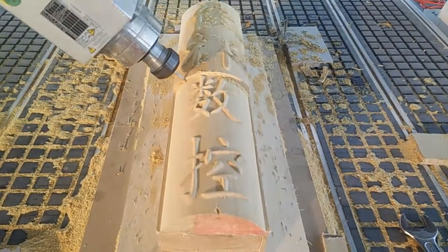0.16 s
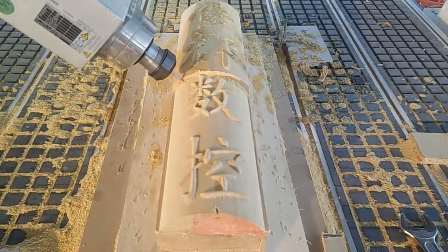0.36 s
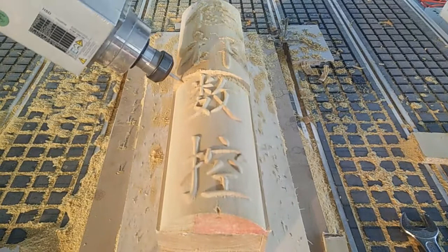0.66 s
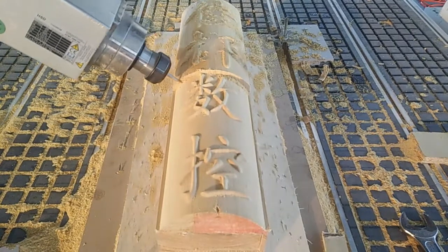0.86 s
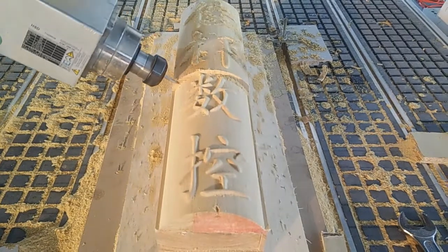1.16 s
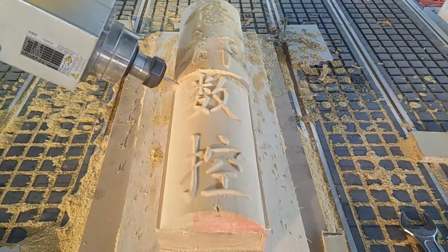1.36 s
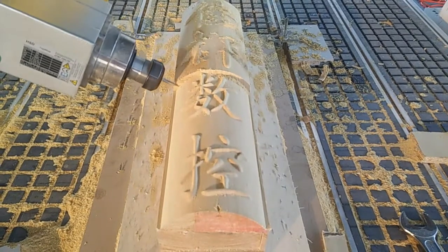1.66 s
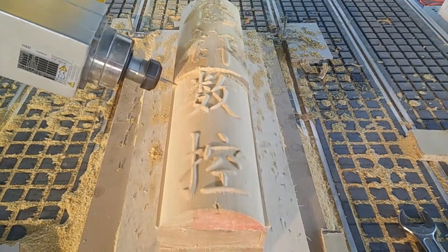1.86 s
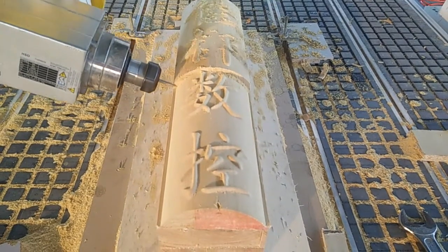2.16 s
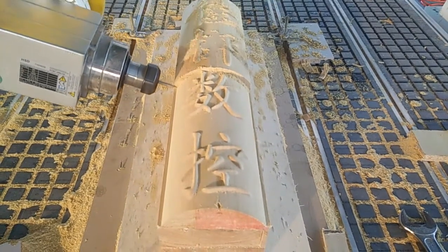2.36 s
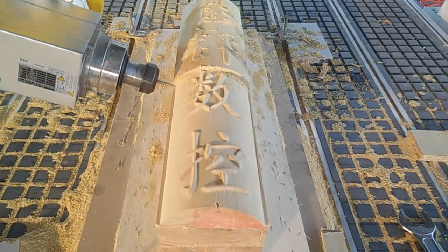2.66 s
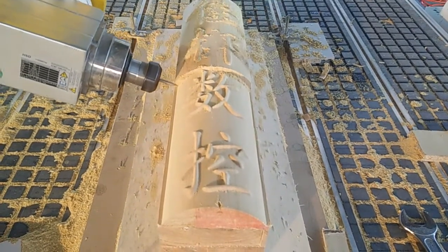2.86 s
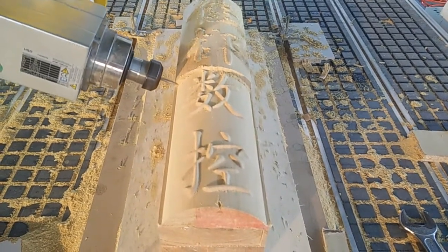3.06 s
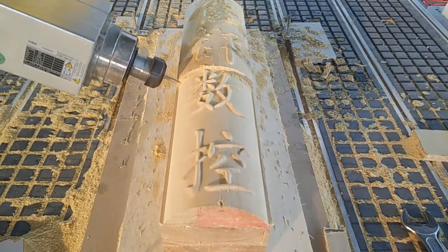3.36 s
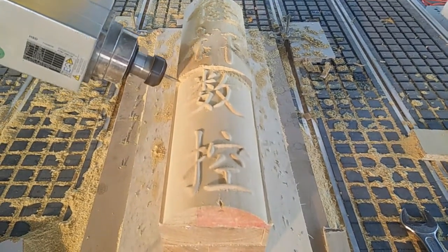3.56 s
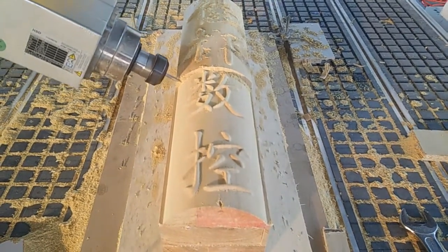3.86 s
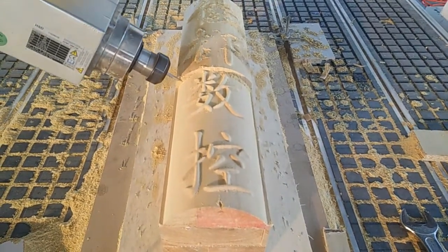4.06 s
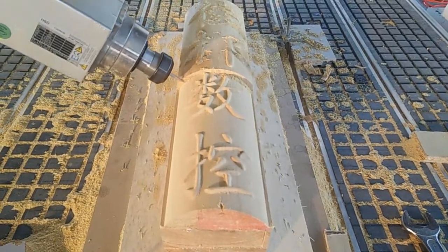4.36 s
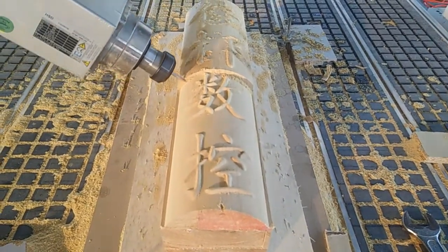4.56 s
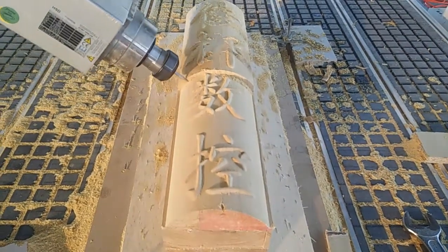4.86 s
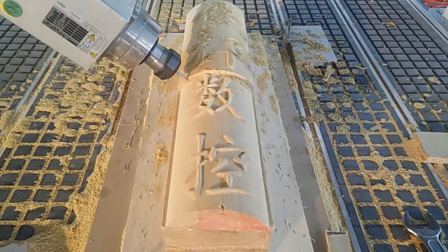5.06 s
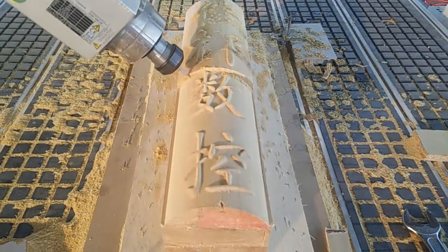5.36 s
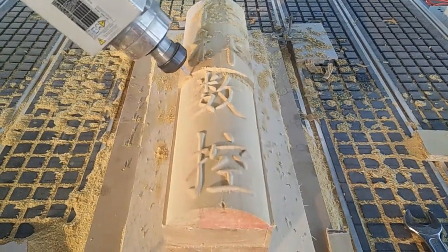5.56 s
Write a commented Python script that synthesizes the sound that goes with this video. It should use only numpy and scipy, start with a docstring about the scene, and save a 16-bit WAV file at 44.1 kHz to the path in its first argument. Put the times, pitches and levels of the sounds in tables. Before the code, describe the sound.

A milling spindle spins without pause for about 5.7 seconds, heard close up in stereo in a workshop. Cooling air rushes hollowly through its housing with thin, wavering whine tones, and within the first half second a bright, slightly raspy hiss with two ringing ridges swells up. Its pitch colour glides differently on each side as the head swings level; scattered hollow knocks and faint ticks poke through. Around 1.8 to 3 seconds the cut bites deeper, and a low drone and rough wooden hum rise; from about 2.2 seconds the right side sinks markedly, leaving the left louder. From 3 to 4.2 seconds short hollow knocks crowd in, with quick scratchy catches and a gap near 3.55. After 4.2 the left side sinks, and at about 4.46 the bass falls away abruptly. A quieter, thinner, steadier hissing rush continues, with short rumbles near 5.1 and 5.5 seconds.

```python
"""A CNC router spindle turns at about 15700 rpm (whining sine partials) as its bit skims a wooden column.
From the start cooling air rushes through the housing (noise through resonances) and a bright two-ridged
hiss swells, shifting as the head swings level. Near 2 s the cut makes wood and bed drone (tones and rough
noise), and the right side sinks. From 3 s hollow knocks (ringing sines) crowd in. Past 4 s the left side
sinks, and at last the bass falls away suddenly, with two short returns of rumble."""
import sys
import numpy as np
from scipy import signal
from scipy.fft import rfft, irfft
from scipy.io import wavfile
from scipy.ndimage import uniform_filter1d, minimum_filter1d, map_coordinates

SR = 44100
rng = np.random.default_rng(int(sys.argv[2]) if len(sys.argv) > 2 else 0)


def store_pcm(level_fs):
    """Save levels as 16-bit WAV."""
    pcm = np.round(np.clip(level_fs, -1, 1) * 32767).astype(np.int16)
    wavfile.write(sys.argv[1], SR, np.atleast_2d(pcm).T)


N = 251370
TIME = np.arange(N) / SR
WINDOW, HOP = 1024, 256  # samples: length and spacing of the frames that slow filters work on
BIN_HZ = np.arange(WINDOW // 2 + 1)[:, None] * SR / WINDOW


def undb(db):
    """Decibels to gain."""
    return 10 ** (np.asarray(db) / 20)


def unit(x):
    """Scale each channel to rms 1."""
    return x / np.sqrt(np.mean(x ** 2, axis=-1, keepdims=True))


def curves(table):
    """The columns of a timed table, one value per sample."""
    s, *columns = np.transpose(table)
    return [np.interp(TIME, s, c) for c in columns]


def on_bins(points):
    """A table of (pitch_hz, value) joined on a log-frequency axis."""
    hz, value = np.transpose(points)
    return np.interp(np.log(np.arange(N // 2 + 1) * SR / N + 1), np.log(hz), value)


def walk(rate):
    """Random levels held 1 / rate s and smoothed twice; spread near 1."""
    hold = max(2, int(SR / rate))
    steps = np.repeat(rng.standard_normal(N // hold + 1), hold)
    return 1.3 * uniform_filter1d(uniform_filter1d(steps, hold), hold)[:N]


def swells(table):
    """Bell-shaped lifts in dB from rows of (centre_s, half_length_s, lift_db)."""
    return sum(db * np.exp(-((TIME - s) / length_s) ** 2) for s, length_s, db in table)


def ramp(start_s, length_s):
    """Rises from 0 to 1 and stays."""
    return np.clip((TIME - start_s) / length_s, 0, 1)


# the head swings up to level and back: time_s, tilt (0 steep - 1 level)
HEAD_SWING = [(0, 0.22), (.5, 0.054), (1.1, 0.31), (1.9, 0.88), (2.7, 0.97), (3.3, 0.63), (4.1, 0.42),
              (5.7, 0.49)]


def by_tilt(steep, level):
    """A value that follows the head between its steep and level positions."""
    return steep + np.clip(curves(HEAD_SWING)[0], 0, 1) * (level - steep)


# likeness of the two sides: pitch_hz, share of common sound (0-1)
SIDE_LIKENESS = [(100, 0.9), (300, 0.77), (700, 0.75), (2300, 0.77), (4500, 0.65), (5400, 0.04), (9000, 0)]


def turbulence(spectrum=None):
    """Two-sided noise at rms 1, partly common to both sides, coloured by a spectrum."""
    common, *own = rfft(rng.standard_normal((3, N)))
    share = np.clip(on_bins(SIDE_LIKENESS), 0, 1)
    bins = np.sqrt(share) * common + np.sqrt(1 - share) * np.array(own)
    colour = 1 if spectrum is None else undb(on_bins(spectrum))
    return unit(irfft(bins * colour, N))


def resonance(hz, width_hz):
    """Power response of a steep-skirted resonance, 1 at its centre."""
    return 1 / (1 + ((BIN_HZ - hz) / width_hz) ** 2) ** 3


def shape(x, gain):
    """Pass a sound through a slowly moving frequency response."""
    frames = signal.stft(x, nperseg=WINDOW, noverlap=WINDOW - HOP)[2]
    last = gain.shape[-1] - 1
    frames = frames * gain[..., np.minimum(np.arange(frames.shape[-1]), last)]
    return signal.istft(frames, nperseg=WINDOW, noverlap=WINDOW - HOP)[1][:, :N]


def ripple(depth_db, spacing_hz, full_hz):
    """Fine fixed peaks and dips that the workshop's echoes give a steady noise, deepest in the treble."""
    hz = np.arange(N // 2 + 1) * SR / N
    bumps = np.interp(hz / spacing_hz, np.arange(WINDOW), rng.standard_normal(WINDOW))
    return undb(depth_db * np.minimum(hz / full_hz, 1) * bumps)


def blow(power):
    """Turbulent air, coloured by the room and shaped by a slowly moving power response."""
    colour = ripple(depth_db=1.25, spacing_hz=24.01, full_hz=2600)
    air = unit(irfft(rfft(turbulence()) * colour, N))
    return shape(air, np.sqrt(power))


# colour of the open air: pitch_hz, relative level_db (per Hz)
AIR_SPECTRUM = [(60, -58), (200, -24.5), (350, -17), (480, -15), (700, -20.5), (1700, -3), (2900, 2.5),
                (3500, 0), (4600, 2), (5700, -1), (6400, -9), (7300, -22.5), (8300, -47.5), (15000, -72.5)]


def open_air(db):
    """The even, wide rush of air round the spindle; it dips when the bit slips."""
    flicker_db = .8 * walk(12)
    slip_db = np.minimum(swells(BIT_CATCHES), 0)
    return turbulence(AIR_SPECTRUM) * undb(db + flicker_db + slip_db)


# colour of the top noise: pitch_hz, relative level_db (per Hz)
TOP_NOISE_SPECTRUM = [(6000, -20), (7400, 4), (8500, 4), (9400, 2), (10300, -8), (11700, -6), (13500, -12),
                      (15500, -30)]
# strength of the top noise: time_s, level_db
TOP_NOISE_STRENGTH = [(0, -67), (.3, -63), (.7, -59), (1.4, -64), (1.9, -64.5), (2.65, -74.5), (3.1, -64),
                      (3.65, -60), (4.1, -61.5), (4.4, -68), (5.7, -67)]


def top_noise(flicker_db, flicker_rate):
    """Faint treble noise above the hiss, flickering unevenly."""
    level_db = curves(TOP_NOISE_STRENGTH)[0] + flicker_db * walk(flicker_rate)
    return turbulence(TOP_NOISE_SPECTRUM) * undb(level_db)


# faint ticks: start_s, level_db of the noise burst at its start
TICK_TIMES = [(.533, -31), (0.714, -24), (1.158, -34), (1.58, -34), (1.641, -27), (1.693, -33),
              (2.858, -31)]


def ticks(decay_s, edge_hz):
    """Short bright ticks over the hiss: bursts of noise that die away fast."""
    out, age = np.zeros(N), TIME[:WINDOW]
    bursts = rng.standard_normal((len(TICK_TIMES), WINDOW))
    for (s, db), burst in zip(TICK_TIMES, bursts):
        start = int(s * SR)
        out[start:start + WINDOW] += undb(db) * burst * np.exp(-age / decay_s)
    return signal.sosfilt(signal.butter(1, edge_hz, fs=SR, output="sos"), out)


# tone at half the shaft rate: its peak relative to the rumble, and how it fades
HALF_TONE_DB, HALF_TONE_DROP_DB = -0.5, -21.5
HALF_TONE_STOP_S, HALF_TONE_FADE_S = 2.6, .3
# colours of the bed and wood noise: pitch_hz, relative level_db (per Hz)
BED_SPECTRUM = [(25, -12.5), (55, -16.5), (82, 8), (110, 4), (135, 3), (165, -1.5), (260, -12.5),
                (500, -62)]
WOOD_SPECTRUM = [(120, -18), (200, -5.5), (260, -0.5), (295, -4), (340, 3), (400, -5), (480, -40.5),
                 (900, -55.5)]
# hum of the bit striking once a turn: time_s, level_db before a small cut and waver
STRIKE_HUM = [(0, -46), (.3, -51.5), (1.0, -50), (1.35, -45), (1.6, -43.5), (1.85, -32), (2.15, -35),
              (2.35, -31.5), (2.52, -30), (2.8, -32), (3.05, -40.5), (3.6, -44), (4.4, -47), (4.6, -54.5),
              (5.7, -51)]


def drone(turns, rumble_db, wood_db):
    """The cut shakes the bed and the column: a tone once a turn, one at half that rate, and rough noise."""
    half_db = HALF_TONE_DB + HALF_TONE_DROP_DB * ramp(HALF_TONE_STOP_S, HALF_TONE_FADE_S)
    half_tone = undb(half_db) * np.sin(np.pi * turns)
    bed = undb(-1.5 + 0.72 * walk(25)) * turbulence(BED_SPECTRUM) + half_tone
    hum_db = curves(STRIKE_HUM)[0] - 1 + 2.3 * walk(26)
    hum = np.sqrt(2) * undb(hum_db) * np.sin(2 * np.pi * turns)
    return bed * undb(rumble_db) + turbulence(WOOD_SPECTRUM) * undb(wood_db) + hum


CHATTER_MODES, CHATTER_COUNT = 6, 260  # how many of the first resonances ring, and how many knocks


def chatter(rush_db, lift_db, scatter_db, detune):
    """Lesser knocks at random moments on low resonances, following the rush: (start_s, pitch_hz, peak_db)."""
    rows = []
    for when, which, tune, size in rng.random((CHATTER_COUNT, 4)):
        at = int(when * N)
        hz, _, steep_db, level_db, _ = HOUSING_MODES[int(which * CHATTER_MODES)]
        knock_hz = hz * (1 + detune * (2 * tune - 1))
        mode_db = (steep_db + level_db) / 2
        rows.append((TIME[at], knock_hz, rush_db[at] + lift_db + mode_db + scatter_db * (2 * size - 1)))
    return rows


def knocks(table, ring_s, attack_s):
    """Short hollow knocks, each a sine that swells quickly and rings out."""
    age = TIME[:4 * WINDOW]
    out = np.zeros(N + len(age))
    envelope = (1 - np.exp(-age / attack_s)) * np.exp(-age / ring_s)
    envelope /= envelope.max()
    for (s, hz, db), phase in zip(table, rng.random(len(table))):
        start = int(s * SR)
        out[start:start + len(age)] += undb(db) * envelope * np.sin(2 * np.pi * (hz * age + phase))
    return out[:N]


# spindle whine: {multiple of the shaft rate: level_db before it wavers}
SHAFT_PARTIALS = {3: -46.5, 4: -52, 6: -36.5, 13: -37, 14: -43.5, 15: -41.5, 16: -39, 17: -41.5, 18: -49}


def whine(turns, waver_db):
    """Steady partials of the shaft, each wavering in strength and reaching each side in its own phase."""
    out = 0
    for multiple, db in SHAFT_PARTIALS.items():
        phase = rng.random((2, 1))
        level = np.sqrt(2) * undb(db + waver_db * walk(9.8))
        out = out + level * np.sin(2 * np.pi * (multiple * turns + phase))
    return out


FLUTTER_DB, STEADIER_FLUTTER_DB = 3, 1  # of narrow resonances, before and after the bass falls away
FLUTTER_WIDTH_HZ = 126  # resonances wider than this flutter less
# resonances of the housing: pitch_hz, width_hz, steep_db and level_db (head steep or level),
# right_db (right side over left)
HOUSING_MODES = [(649.6, 44, 1, 0, -0.5), (827.4, 114, -1, -0.5, -0.5), (1112, 103, -6, -0.5, 4),
                 (1294, 67, -13, 2.5, 4.5), (1513.4, 71, 3, 5.5, 1.5), (1866, 54, 7.5, -1.5, -5),
                 (2282, 107, 0.5, -1.5, 8), (2662, 90, -0.5, 3.5, -2.5), (2840, 167, -15, 9.5, -2),
                 (3180, 100, 6, -0.5, -2), (3520, 235, 8, 2.5, 0)]


def housing(dropped, flutter_rate, wander_share):
    """Cooling air rings the housing; the tilt sets each resonance's strength, and each wanders a little."""
    flutter_db = FLUTTER_DB + dropped * (STEADIER_FLUTTER_DB - FLUTTER_DB)
    power = 0
    for hz, width_hz, steep_db, level_db, right_db in HOUSING_MODES:
        flutter = flutter_db * min(1, FLUTTER_WIDTH_HZ / width_hz) * walk(flutter_rate)
        db = (by_tilt(steep_db, level_db) + flutter)[::HOP]
        centre_hz = hz * (1 + wander_share * walk(14)[::HOP])
        sides = undb([db, db + right_db])[:, None] ** 2
        power = power + sides * resonance(centre_hz, width_hz)
    return unit(blow(power))


# the bit catches or slips in the grain: centre_s, half_length_s, hiss lift_db
BIT_CATCHES = [(1.829, 0.0086, 2.5), (1.977, 0.0068, 8), (2.31, 0.013, 4.5), (2.858, 0.0054, 5),
               (2.892, 0.011, 6.5), (3.248, 0.0036, 0), (3.466, 0.009, 3), (3.487, 0.0049, 8),
               (3.509, .003, 4), (3.519, 0.011, -6), (3.538, .003, 2), (3.57, .004, -11),
               (3.577, .0025, 12), (3.587, 0.0078, 5), (3.645, 0.027, 3), (3.859, .003, 11),
               (3.897, .003, 0), (3.989, 0.0045, 2), (4.017, 0.0047, 7)]
# strength of the hiss: time_s, left_db, right_db
HISS_STRENGTH = [(0, -20, -20), (.08, -12, -13), (.45, -8, -9.5), (.85, -9, -5), (1.35, -8, -5.5),
                 (1.75, -13, -14.5), (2.3, -8, -11.5), (2.5, -18, -10), (2.66, -12, -8), (2.88, -13.5, -11),
                 (3.02, -14, -10), (3.25, -12.5, -12.5), (3.65, -10, -12.5), (4.0, -11, -11),
                 (4.4, -16, -11.5), (5.7, -13.5, -13)]
# weaker bands round the ridges: pitch_hz, width_hz, steep_db and level_db (head steep or level)
HISS_SHOULDERS = [(4220, 946, -16, -17), (5485, 365, -20.5, -16)]
# two ringing ridges as each side hears them: time_s, lower_hz, upper_hz, upper_db (upper over lower)
LEFT_RIDGES = [(.45, 3850, 4400, 0), (.95, 4210, 4420, -0.5), (1.55, 4130, 4690, -3.5),
               (2.1, 4120, 4650, -10), (2.4, 4225, 4840, -9.5), (2.75, 4330, 4710, -0.5),
               (3.2, 4110, 4660, -13.5), (3.7, 4006, 4810, -14), (4.05, 3980, 4460, -6.5),
               (4.5, 3780, 4360, 0.5)]
RIGHT_RIDGES = [(.5, 4350, 4620, -10), (1.05, 4504, 4660, -3), (1.5, 4340, 4820, 4.5),
                (2.1, 4320, 4950, -0.5), (2.749, 4360, 4810, 5.5), (3.7, 4300, 4680, -4.5),
                (4.5, 4286, 4780, -6.5)]
# widths of the ridges: lower_hz, upper_hz
RIDGE_WIDTHS = (325, 257)


def hiss(dropped, rasp_db, rasp_rate, waver_hz, sway_db):
    """Two ringing ridges from the whirling tool glide and trade strength; uneven bites make them rasp."""
    shoulders = 0
    for hz, width_hz, steep_db, level_db in HISS_SHOULDERS:
        shoulders = shoulders + undb(by_tilt(steep_db, level_db)[::HOP]) ** 2 * resonance(hz, width_hz)
    power = []
    for table in (LEFT_RIDGES, RIGHT_RIDGES):
        lower_hz, upper_hz, upper_db = curves(table)
        lower, upper = (resonance((hz + waver_hz * walk(25))[::HOP], width_hz)
                        for hz, width_hz in zip((lower_hz, upper_hz), RIDGE_WIDTHS))
        weight = undb(upper_db[::HOP]) ** 2
        power.append((lower + weight * upper) / (1 + weight) + shoulders)
    sides_db = [db + swells(BIT_CATCHES) + sway_db * walk(8.3) for db in curves(HISS_STRENGTH)]
    rasp = undb(rasp_db * (1 - dropped / 2) * walk(rasp_rate))
    return unit(blow(np.array(power)) * rasp) * undb(sides_db)


# hollows that move as the head swings, each a list of: time_s, centre_hz, depth_db (negative is a dip)
MOVING_HOLLOWS = [
    [(0, 3020, -6), (.3, 2886, -18), (.8, 2850, -10), (1.3, 2803, 3.5)],
    [(.6, 2050, -3.5), (1.05, 2025, -6), (1.7, 2070, -3), (2.1, 2360, -6.5), (2.4, 2435, -7.5),
     (2.75, 2500, -6), (3.1, 2330, -2.5), (4.2, 2470, -1.5), (4.6, 2495, -5.5)],
]


def hollow(width_hz):
    """Moving notches in dB, as from the direct sound meeting its echo off the wood."""
    return sum(db[::HOP] * resonance(hz[::HOP], width_hz) for hz, db in map(curves, MOVING_HOLLOWS))


STREAK_DB, STREAK_S, STREAK_BINS = 3.2, .09, 3  # spread, smoothing in time and in frequency bins


def streaks(patchy):
    """Short-lived narrow treble peaks and dips in dB, random on each side, until the bass falls away."""
    spread = (1, STREAK_BINS, int(STREAK_S * SR / HOP))
    field = rng.standard_normal((2, len(BIN_HZ), len(TIME[::HOP])))
    for axis in (1, 2, 2):
        field = uniform_filter1d(field, spread[axis], axis=axis)
    treble = np.clip(BIN_HZ / 1200 - 1, 0, 1)
    return STREAK_DB * treble * patchy[::HOP] * field / field.std()


UPPER_WIDTH_HZ = 550
# a band above the ridges as each side hears it: time_s, centre_hz, lift_db (negative is a dip)
LEFT_UPPER_BAND = [(.3, 4800, -3), (.9, 5360, -4), (1.7, 6100, -5), (2.7, 6200, -9), (3.4, 5850, -9.5),
                   (3.9, 5400, -0.5), (4.6, 5400, 2)]
RIGHT_UPPER_BAND = [(0.299, 5400, -5), (1.0, 5830, -2.5), (1.5, 5930, 3.5), (2.0, 5960, 8), (2.6, 6100, 4),
                    (3.4, 6300, 10.5), (4.6, 6300, 2.5)]


def colour_treble(x, patchy):
    """Moving hollows, a band that differs on each side, and random streaks colour the sound."""
    upper_db = [db[::HOP] * resonance(hz[::HOP], UPPER_WIDTH_HZ)
                for hz, db in map(curves, (LEFT_UPPER_BAND, RIGHT_UPPER_BAND))]
    return shape(x, undb(hollow(width_hz=374) + upper_db + streaks(patchy)))


SHAFT_HZ = 261.7  # mean turns per second
# the bass falls away suddenly and the sound grows steadier
BASS_DROP_S, BASS_DROP_LENGTH_S = 4.46, .02
DROP_RUSH_DB, DROP_RUMBLE_DB, DROP_WOOD_DB = -0.5, -27.5, -6.5
# levels with the head steep and level
RUSH_STEEP_DB, RUSH_LEVEL_DB = -20, -22
RUMBLE_STEEP_DB, RUMBLE_LEVEL_DB = -49.5, -42
WOOD_STEEP_DB, WOOD_LEVEL_DB = -54.5, -41.5
RUSH_LEFT_DB = 1.5  # the rush leans to the left until the bass falls away
KNOCK_RIGHT_DB = -6  # the knocks lean to the left
RIGHT_LAG_S = 0.00013
# surges of the rush, jolts of the bed, deeper cuts of the bit: centre_s, half_length_s, lift_db
RUSH_SURGES = [(.2, 0.34, 4.5), (.65, 0.047, 3.5), (1.05, 0.25, 4.5), (2.93, 0.073, -2), (3.26, 0.1, 2),
               (3.55, 0.35, 2), (3.84, 0.074, 3), (4.15, 0.17, 3.5)]
BED_JOLTS = [(.04, 0.26, 7), (.76, .08, -6), (1.2, 0.26, 7.5), (1.8, 0.17, 3.5), (2.48, 0.11, 9),
             (2.94, 0.12, 10), (3.24, .07, 9.5), (3.52, 0.082, 6), (3.76, .04, 7.5), (4.38, 0.088, 5),
             (5.07, .04, 24), (5.54, 0.11, 20)]
DEEP_CUTS = [(.1, 0.11, 8.5), (1.88, 0.14, 10.5), (2.5, 0.13, 9), (2.75, 0.13, 10.5)]
# knocks of the cut, each ringing mainly one resonance: start_s, pitch_hz, peak_db (on the left)
CUT_KNOCKS = [(.12, 392, -29), (.138, 1790, -19), (.465, 813, -19), (.59, 1527, -16.5), (.873, 1517, -14),
              (.995, 643, -14), (1.132, 827, -16), (1.303, 1474, -15), (1.623, 1500, -17),
              (1.66, 655, -23.5), (1.774, 676, -19.5), (2.543, 642, -17), (2.81, 2774, -12.5),
              (3.06, 2950, -12), (3.149, 1504, -12.5), (3.18, 1560, -13.5), (3.194, 266, -24.5),
              (3.232, 1490, -11), (3.262, 1820, -20), (3.27, 2740, -10), (3.283, 648, -15),
              (3.325, 1890, -22), (3.452, 657, -17), (3.462, 2784, -10), (3.533, 1477, -14),
              (3.635, 667, -18), (3.765, 1504, -12.5), (3.824, 1120, -17.5), (3.862, 825, -18),
              (4.032, 647, -16.5), (4.07, 655, -18), (4.085, 660, -19), (4.1, 2590, -15),
              (4.106, 787, -14.5), (4.144, 1475, -12.5), (4.163, 634, -17.5), (4.18, 2620, -12.5),
              (4.205, 2630, -14)]


def scene():
    """Mix the sources, many following the head's tilt; sound reaches the left side a little sooner."""
    dropped = ramp(BASS_DROP_S, BASS_DROP_LENGTH_S)
    rush_db = by_tilt(RUSH_STEEP_DB, RUSH_LEVEL_DB) + swells(RUSH_SURGES)
    rush_db += DROP_RUSH_DB * dropped + 0.86 * walk(35)
    rumble_db = by_tilt(RUMBLE_STEEP_DB, RUMBLE_LEVEL_DB) + swells(BED_JOLTS)
    rumble_db += DROP_RUMBLE_DB * dropped + 1.8 * walk(9)
    wood_db = by_tilt(WOOD_STEEP_DB, WOOD_LEVEL_DB) + swells(DEEP_CUTS) + DROP_WOOD_DB * dropped
    turns = np.cumsum(SHAFT_HZ * (1 + 0.00038 * walk(3.5))) / SR

    rush_sides_db = [rush_db + RUSH_LEFT_DB * (1 - dropped), rush_db]
    out = housing(dropped, flutter_rate=45, wander_share=0.016) * undb(rush_sides_db)
    out += hiss(dropped, rasp_db=1.28, rasp_rate=130, waver_hz=25.4, sway_db=0.5)
    out = colour_treble(out + open_air(db=-23.5), patchy=1 - dropped)

    blows = knocks(CUT_KNOCKS, ring_s=0.011, attack_s=0.0052)
    lesser = chatter(rush_db, lift_db=-5.5, scatter_db=3.5, detune=0.044)
    blows += knocks(lesser, ring_s=0.007, attack_s=0.0036)
    out += blows * undb([[0], [KNOCK_RIGHT_DB]])
    out += whine(turns, waver_db=3.0) + drone(turns, rumble_db, wood_db)
    out += ticks(decay_s=0.0014, edge_hz=20000) + top_noise(flicker_db=2.5, flicker_rate=18)

    heard_at = np.arange(N) - RIGHT_LAG_S * SR
    right = map_coordinates(out[1], [heard_at], order=5, mode="nearest")
    return np.array([out[0], right])


CEILING, TOP_HZ = .95, 14500  # limiter peak, and where the treble is cut
# how far each side has sunk: time_s, level_db
LEFT_SINK = [(0, -0.5), (4.18, -3), (4.45, -12.5)]
RIGHT_SINK = [(0, 3), (2.18, 0), (2.42, -13.5)]


def record(dry):
    """Each side sinks in its turn; a limiter holds the peaks, and the top is cut."""
    sunk = dry * undb([curves(LEFT_SINK)[0], curves(RIGHT_SINK)[0]])
    headroom = minimum_filter1d(CEILING / np.maximum(np.abs(sunk), CEILING), size=400)
    held = sunk * uniform_filter1d(uniform_filter1d(headroom, size=200), size=200)
    return signal.sosfilt(signal.ellip(8, .2, 70, TOP_HZ, fs=SR, output="sos"), held)


dry = scene()
out = record(dry)
store_pcm(out)
```